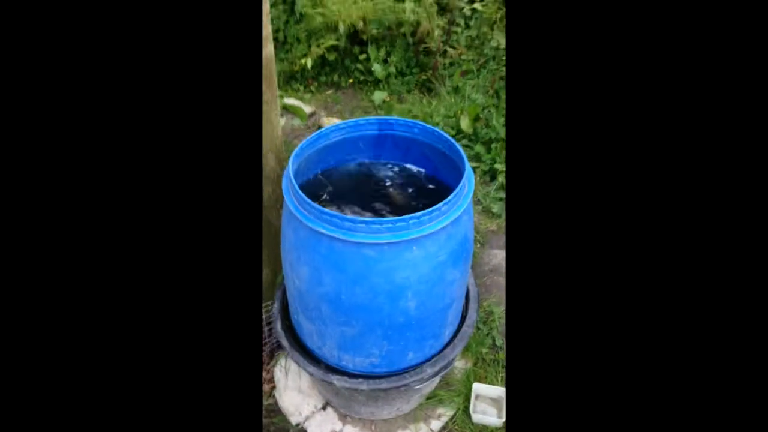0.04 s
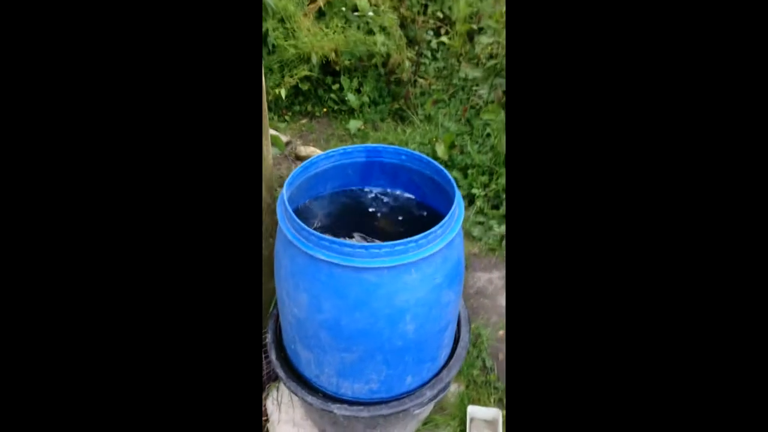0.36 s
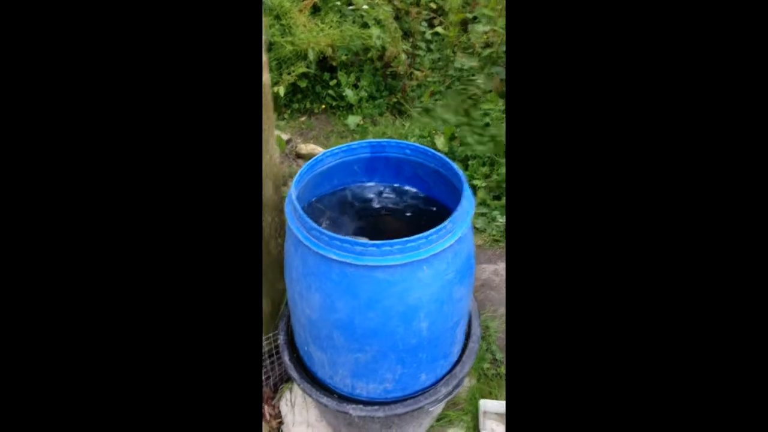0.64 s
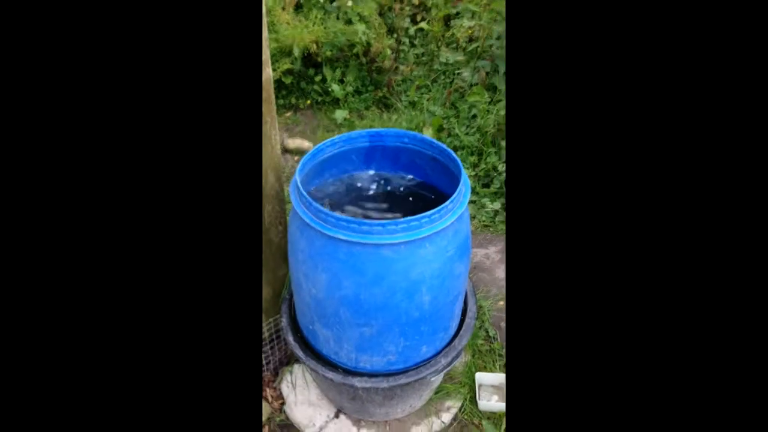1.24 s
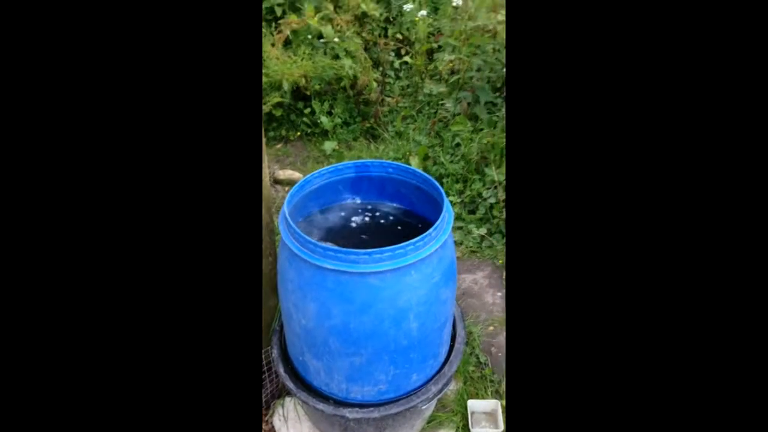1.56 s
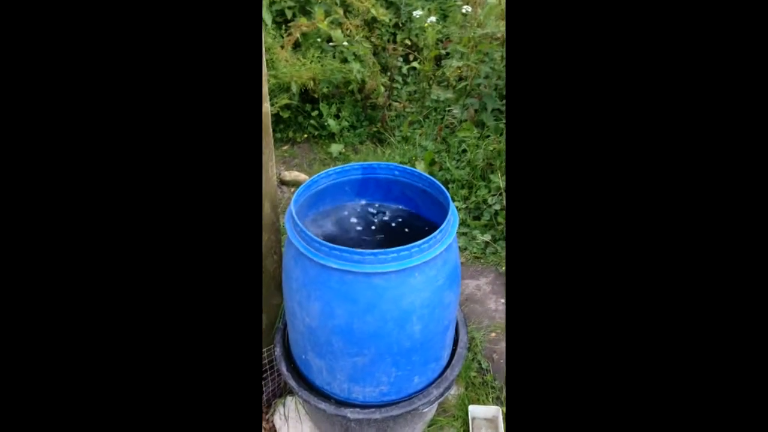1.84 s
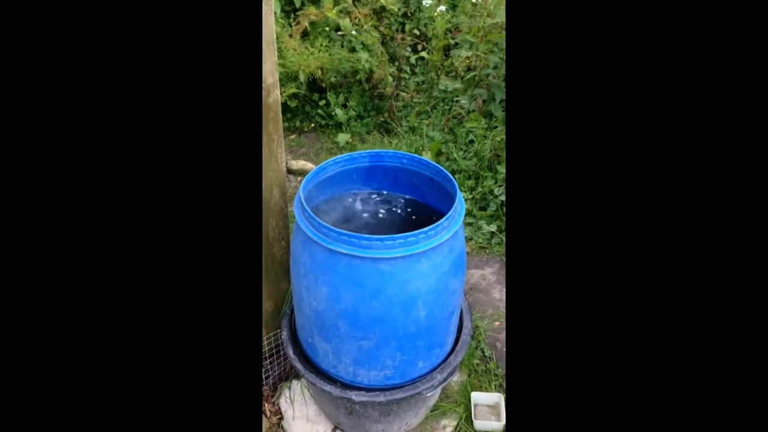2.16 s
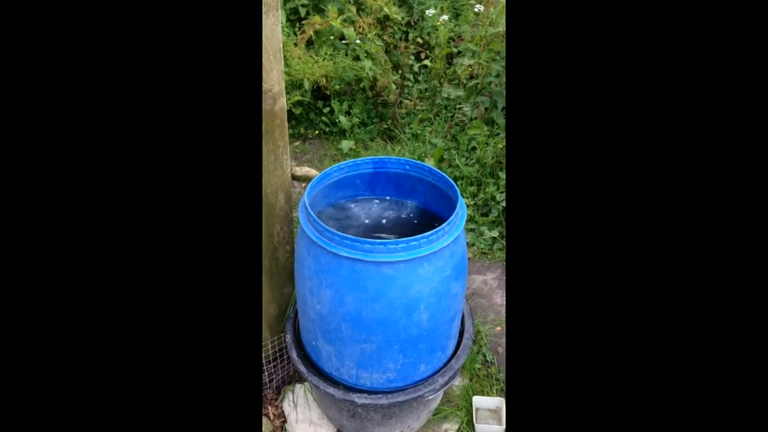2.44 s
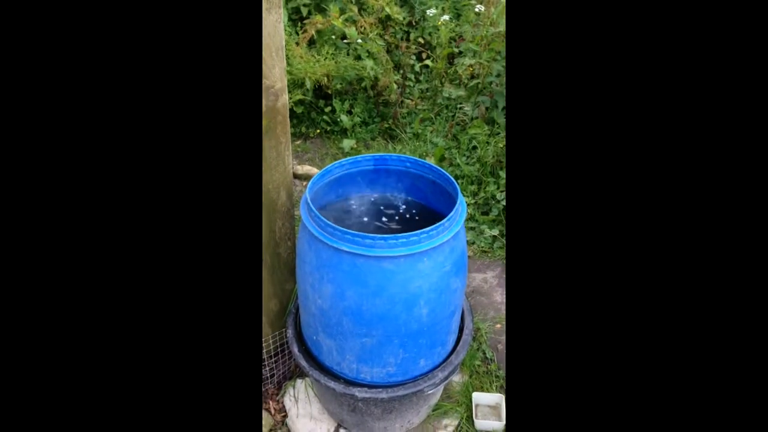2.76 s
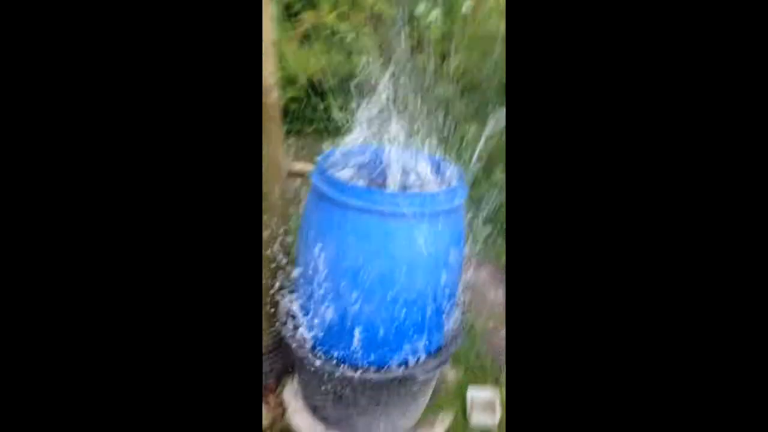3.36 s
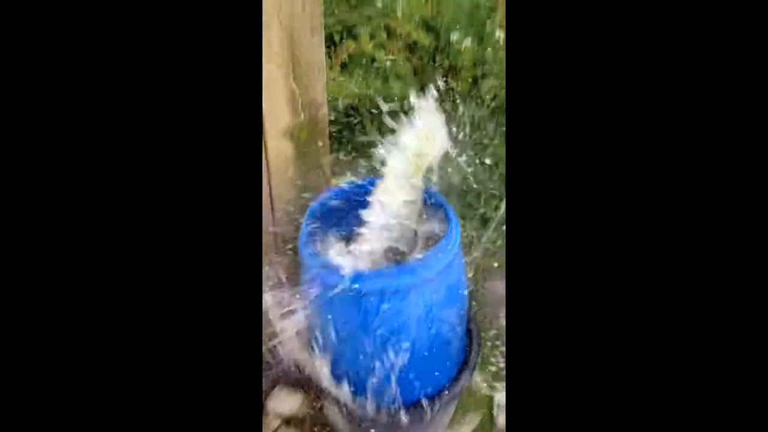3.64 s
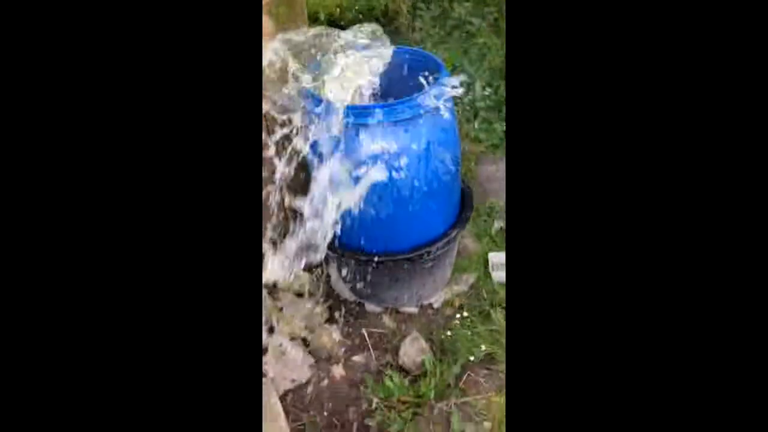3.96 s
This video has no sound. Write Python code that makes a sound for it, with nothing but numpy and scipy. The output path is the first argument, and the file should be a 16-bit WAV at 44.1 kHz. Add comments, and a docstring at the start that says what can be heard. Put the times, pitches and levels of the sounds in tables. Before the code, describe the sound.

A firecracker goes off underwater in a plastic barrel with one loud, hollow bang. Before it, birds chirp softly in a quiet garden while the fuse spits and bubbles. Afterwards spray and heavy slaps of water fall close by.

```python
"""Songbirds and a spitting fuse in a quiet garden: a firecracker sinks in a plastic rain barrel.
Its gas bubbles up; the barrel's hollow hums faintly. At about 3.3 s it goes off under water:
shocks ring the wall, the gas pocket throbs and the surface bursts with a crack.
The thrown water comes down as spray and heavy slaps while trapped air gulps in the barrel."""
import sys
import numpy as np
from scipy import signal
from scipy.fft import rfft, irfft
from scipy.io import wavfile
from scipy.ndimage import map_coordinates

SR = 44100
rng = np.random.default_rng(int(sys.argv[2]) if len(sys.argv) > 2 else 0)


def put_to_file(sound):
    """Save the sound as 16-bit audio at rate SR, in the file named by the first command-line argument."""
    columns = np.atleast_2d(sound).T  # one column per channel
    safe = np.clip(columns, -1, 1)
    whole_steps = np.round(safe * 32767)
    wavfile.write(sys.argv[1], SR, whole_steps.astype(np.int16))


N = 176400
T = np.arange(N) / SR


def from_db(db):
    """Decibels to gain."""
    return 10 ** (np.asarray(db) / 20)


def rms_one(x):
    """Scale to unit rms."""
    return x / np.sqrt(np.mean(x ** 2) + 1e-20)


def butter(x, hz, kind):
    """Second-order low- or high-pass."""
    return signal.sosfilt(signal.butter(2, min(hz, .45 * SR), kind, fs=SR, output="sos"), x + 1e-18)


def coloured(spectrum, x=None):
    """White noise, or texture x, shaped by (Hz, dB) points; rms 1."""
    hz, db = np.transpose(spectrum)
    f = np.maximum(np.fft.rfftfreq(N, 1 / SR), 1)
    gain = from_db(np.interp(np.log(f), np.log(hz), db)) / np.sqrt(1 + (hz[0] / 2 / f) ** 4)
    return rms_one(irfft(rfft(rng.standard_normal(N) if x is None else x) * gain, N))


def drift(per_s):
    """Smooth random curve, spread about 1."""
    knots = rng.standard_normal(N // 20)
    return map_coordinates(knots, [T * per_s], order=3, mode="wrap")


def ring(x, hz, t60_s):
    """Resonator: a unit click starts a decaying sine of height 1."""
    r, w = np.exp(-np.log(1000) / (t60_s * SR)), 2 * np.pi * hz / SR
    return signal.lfilter([0, np.sin(w)], [1, -2 * r * np.cos(w), r * r], x + 1e-18)


def envelope(rows, attack_s):
    """Amplitude of events that rise, hold and die, summed in power."""
    power = np.zeros(N)
    for start_s, db, hold_s, t60_s in rows:
        rise = from_db(db) * np.clip((T - start_s) / attack_s, 0, 1)
        power += rise ** 2 * np.exp(-np.clip(2 * np.log(1000) * (T - start_s - hold_s) / t60_s, 0, 60))
    return np.sqrt(power)


def grains(per_s, low_hz, high_hz, cycles, spread_db):
    """Random drops, each ringing briefly at one of 20 pitches; rms 1."""
    sizes = from_db(spread_db * np.minimum(rng.exponential(1, N), 5)) * rng.choice([-1, 1], N)
    clicks = sizes * (rng.random(N) < per_s / SR)
    pitch_index = rng.integers(0, 20, N)
    return rms_one(sum(ring(clicks * (pitch_index == k), hz, cycles / hz) * hz
                       for k, hz in enumerate(np.geomspace(low_hz, high_hz, 20))))


def whistle(start_s, length_s, pitch_hz, swell_share=0.32):
    """Soft-edged tone at pitch_hz(u, t): progress u from 0 to 1, scene time t in seconds."""
    tone = np.zeros(N)
    on = (T >= start_s) & (T < start_s + length_s)
    u = (T[on] - start_s) / length_s
    level = np.sqrt(2 * np.sin(np.pi * u) * np.minimum(u / swell_share, 1))
    tone[on] = level * np.sin(2 * np.pi * np.cumsum(pitch_hz(u, T[on])) / SR)
    return tone


def garden_echo(x, t60_s=0.62):
    """Diffuse echo from walls and hedges."""
    tail = rng.standard_normal(N) * np.exp(-np.log(1000) * T / t60_s) * (T > .012)
    return signal.fftconvolve(x, tail / np.sqrt(np.sum(tail ** 2)))[:N]


def background():
    """Still garden air and two wavering resonances of the barrel's hollow."""
    # Garden air. Each row: frequency in Hz, level in dB.
    air_colour = [(30, -10.5), (55, 0), (100, -2.5), (170, -3.5), (250, -16), (440, -17.5), (600, -21),
                  (900, -23.5), (1500, -27.5), (2300, -23.5), (3000, -25.5), (6000, -29.5), (13500, -32.5),
                  (15000, -41)]
    # Cavity modes. Each row: frequency in Hz, bandwidth in Hz, level in dB.
    modes = [(159, 24.5, -56.5), (567.3, 28.5, -59)]
    # Hum swells. Each row: time in seconds, lower mode's offset in dB, upper mode's offset in dB.
    swells = [(0, -2.5, 3), (1.0, -2.5, 0), (1.25, 3, -1.5), (1.9, -1, -1.5), (2.25, 4.5, -8),
              (2.8, 4.5, -15), (3.202, 3, -4), (4, -7, 9.5)]
    times_s, *offsets_db = np.transpose(swells)
    hum = np.zeros(N)
    for (hz, width_hz, db), offset_db in zip(modes, offsets_db):
        level = from_db(db + np.interp(T, times_s, offset_db) + drift(13))
        mode = ring(rng.standard_normal(N), hz, t60_s=np.log(1000) / (np.pi * width_hz))
        hum += level * rms_one(butter(mode, 0.74 * hz, "high"))
    return from_db(-55.5) * coloured(air_colour) + hum


def birds(trill_hz=84.4, chip_from_hz=4000, chip_to_hz=3050):
    """One bird glides and trills, a second adds a swelling run of falling chips; both echo."""
    # Song. Each row: start and length in seconds, first, middle and last pitch in Hz,
    # level in dB, trill depth in Hz.
    notes = [(-.03, 0.083, 2850, 2530, 2210, -52.5, 170), (0.151, 0.041, 4550, 4900, 5300, -46.5, 82),
             (0.212, 0.053, 4900, 4550, 4500, -48.5, 400), (0.36, 0.062, 3940, 3680, 3680, -43.5, 22),
             (.405, 0.049, 3660, 3830, 3920, -43.5, 20), (0.557, 0.038, 4620, 4400, 4360, -47, 100),
             (0.593, 0.033, 3860, 3300, 3020, -40, 90), (0.694, 0.032, 3210, 3300, 3170, -48, 30),
             (0.717, 0.078, 3650, 3406, 3066, -43, 46), (1.222, 0.16, 2110, 2350, 2230, -64.5, 50),
             (1.317, 0.13, 2280, 2170, 2160, -59.5, 89), (1.597, .18, 2297, 2060, 1855, -61.5, 160),
             (1.804, 0.097, 2445, 2338, 2250, -56, 19), (1.889, .07, 2005, 1950, 1970, -59.5, 50),
             (2.07, .10, 2340, 2325, 2285, -65.5, 30), (2.196, 0.062, 2290, 2600, 2960, -56.5, 120),
             (2.251, 0.095, 2980, 3000, 2950, -59, 97), (2.259, 0.34, 1755, 1644, 1560, -71, 13),
             (2.513, 0.11, 1764, 2228, 2810, -52.5, 59), (2.96, 0.057, 4360, 3850, 3180, -61.5, 450),
             (3.009, 0.025, 3200, 3190, 3200, -54.5, 17), (3.026, .035, 2640, 2620, 2620, -65, 23),
             (3.122, 0.056, 4430, 3770, 3240, -62, 390), (3.164, 0.037, 3260, 3110, 3100, -56.5, 20)]
    song, chips = np.zeros(N), np.zeros(N)
    for start_s, length_s, first_hz, middle_hz, last_hz, db, depth_hz in notes:
        glide = np.polyfit([0, .5, 1], [first_hz, middle_hz, last_hz], 2)
        def note_hz(u, t):
            return np.polyval(glide, u) + depth_hz * np.sin(2 * np.pi * trill_hz * t)
        song += from_db(db) * whistle(start_s, length_s, note_hz)
    blur_hz = 352 * drift(900)
    def chip_hz(u, t):
        return chip_from_hz + (chip_to_hz - chip_from_hz) * u + np.interp(t, T, blur_hz)
    for k in range(10):
        chips += from_db(-64 + 0.5 * k) * whistle(2.38 + .0535 * k, 0.026, chip_hz)
    song *= from_db(3.5 * drift(130))
    return song + chips + garden_echo(from_db(-8) * song + from_db(-3.5) * chips)


def fuse(rise_s=0.059, fall_s=0.031):
    """The burning fuse spits puffs of fluttering hiss."""
    # Puffs. Each row: start in seconds, length in seconds, level in dB.
    spits = [(0.0, 0.12, -50.5), (0.108, 0.19, -50), (0.499, 0.11, -47.5), (0.585, .088, -47.5),
             (0.805, 0.11, -52.5), (0.89, 0.11, -62), (1.0, 0.11, -59.5), (1.304, 0.082, -51.5)]
    # Hiss. Each row: frequency in Hz, level in dB.
    hiss_colour = [(500, -6.5), (1200, -2), (2500, 0), (4500, 5), (7000, -2.5), (10000, -4), (15000, -15)]
    puffs = np.zeros(N)
    for start_s, length_s, db in spits:
        rise = np.clip((T - start_s) / rise_s, 0, 1) ** 0.62
        fall = np.clip((start_s + length_s - T) / fall_s + .5, 0, 1)
        puffs += from_db(db) * rise * fall
    return puffs * from_db(1.1 * drift(120)) * coloured(hiss_colour)


def bubbles(length_s=.085, from_hz=600, to_hz=2127):
    """Gas bubbles open at the surface: an upward sweep and a puff of froth each."""
    # Bubbles. Each row: start in seconds, tone level in dB, froth level in dB.
    blips = [(.12, -61.5, -67), (.365, -70, -65), (.595, -59, -52), (.715, -62, -68), (.82, -70, -48.5),
             (1.31, -69, -67), (1.51, -60.5, -67), (3.075, -69, -79)]
    def sweep_hz(u, t):
        return from_hz * (to_hz / from_hz) ** (u ** 1.6)
    tones = sum(from_db(db) * whistle(start_s, length_s, sweep_hz) for start_s, db, _ in blips)
    froth = envelope([(start_s + 0.012, db, .04, .1) for start_s, _, db in blips], attack_s=0.028)
    froth_colour = [(600, -7), (1000, -3), (1600, 6), (2400, -6), (5000, -11.5)]
    return tones * from_db(2 * drift(220)) + froth * coloured(froth_colour)


def barrel_boom():
    """Shocks strike the plastic wall and ring its modes."""
    # Shocks. Each row: time in seconds, gain in dB, contact low-pass in Hz.
    shocks = [(3.2595, -25, 1450), (3.2711, -5, 700), (3.2770, -0.5, 610), (3.2834, 2, 3000),
              (3.2941, 4, 4000)]
    # Wall modes, one entry each: frequency in Hz, gain in dB, T60 in seconds.
    modes_hz = [87, 140, 188, 221, 264, 316, 389, 472, 507, 540, 612, 733, 806, 874, 1055, 1106, 1240, 1462,
                1571, 3472]
    modes_db = [-18, -22, -16, -20, -22, -20, -24, -23, -32, -27, -21, -24, -30, -22.5, -22.5, -26.5, -25,
                -27, -27, -20]
    modes_t60_s = [.09, 0.05, 0.16, 0.12, 0.19, .15, 0.14, 0.086, 0.16, 0.21, .14, .11, .1, 0.12, 0.076,
                   0.16, 0.08, .08, .08, .04]
    force = sum(butter(from_db(db) * (np.arange(N) == int(time_s * SR)), contact_hz, "low")
                for time_s, db, contact_hz in shocks)
    return sum((-1) ** k * from_db(db) * ring(force, hz, t60_s)
               for k, (hz, db, t60_s) in enumerate(zip(modes_hz, modes_db, modes_t60_s)))


def surface_burst():
    """The surface tears open in cracks of rough noise; a brief squeak precedes the loudest."""
    # Cracks. Each row: start in seconds, level in dB, hold and T60 in seconds.
    cracks = [(3.2595, -38.5, 0.016, 0.076), (3.2826, -12.5, .004, 0.054), (3.2928, -8, .0045, 0.024),
              (3.300, -25.5, 0.0089, .19)]
    # Tearing water. Each row: frequency in Hz, level in dB.
    tear_colour = [(300, 3), (480, 10.5), (900, 9), (1500, 2.5), (2100, -2.5), (3100, 0), (3500, 2.5),
                   (4000, -3.5), (5500, -7), (9000, -11.5), (15000, -15)]
    tear = coloured(tear_colour, rng.standard_normal(N) * from_db(1.2 * drift(1500)))
    squeak = whistle(start_s=3.272, length_s=0.0095, pitch_hz=lambda u, t: np.full_like(u, 3000))
    return envelope(cracks, attack_s=0.00043) * tear + from_db(-28) * squeak


def gas_throb(start_s=3.2741, hold_s=0.015, edge_s=0.0022, start_hz=240.4, rise_hz_per_s=3730):
    """The gas pocket swells, throbs with rising pitch and dies."""
    t = T - start_s
    level = np.exp(np.clip(np.minimum(t, hold_s - t) / edge_s, -60, 0))
    turns = np.cumsum(start_hz + rise_hz_per_s * np.clip(t, 0, hold_s)) / SR
    return from_db(-3) * level * np.sin(2 * np.pi * (turns - np.interp(start_s, T, turns)))


def heave(centre_s=3.2802, width_s=0.003):
    """The water surface lifts: one push and pull of air."""
    u = (T - centre_s) / width_s
    return -from_db(-13.5) * u * np.exp(-np.minimum(u * u, 100) / 2)


def churn():
    """Churning water: a short, low rush."""
    # Surge. One row: start in seconds, level in dB, hold and T60 in seconds.
    surge = [(3.285, -21.5, 0.041, 0.25)]
    # Rush. Each row: frequency in Hz, level in dB.
    rush_colour = [(50, -24), (140, -6.5), (240, 1), (450, -9.5), (700, -20), (1500, -24), (4000, -58)]
    return envelope(surge, attack_s=0.015) * coloured(rush_colour)


def spray(drops_per_s=9800, fade_in_s=0.029):
    """Thrown water falls as patter, mist, ringing droplets and short splats."""
    # Fall of spray. Each row: time in seconds, level in dB.
    shower = [(3.42, -58.5), (3.43, -56), (3.446, -65.5), (3.514, -40), (3.546, -36.5), (3.592, -43),
              (3.628, -28.5), (3.748, -44.5), (3.796, -33.5), (3.944, -42), (4.0, -43.5)]
    # Patter and mist. Each row: frequency in Hz, level in dB.
    spray_colour = [(880, -7), (1500, -1.5), (2100, -2.5), (2620, -3), (2970, -2), (4330, -3), (7210, -11),
                    (12500, -16.5), (15000, -23.5)]
    times_s, levels_db = np.transpose(shower)
    level = from_db(np.interp(T, times_s, levels_db)) * np.clip((T - times_s[0]) / fade_in_s + 1, 0, 1)
    impacts = rng.standard_normal(N) * (rng.random(N) < drops_per_s / SR)
    impacts *= from_db(4 * np.minimum(rng.exponential(1, N), 4))
    patter = from_db(-3) * coloured(spray_colour, impacts)
    mist = from_db(-1) * coloured(spray_colour)
    hiss = butter(patter + mist, 700, "high")
    droplets = from_db(-19) * grains(per_s=3900, low_hz=1000, high_hz=4870, cycles=18, spread_db=1)
    splats = from_db(-9) * grains(per_s=260, low_hz=1500, high_hz=8000, cycles=4, spread_db=2)
    return level * from_db(1.5 * drift(150)) * (hiss + droplets + splats)


def gulps(attack_s=0.0039, rise_per_s=2.72):
    """Big pockets of trapped air ring with rising pitch."""
    # Air pockets. Each row: start in seconds, starting pitch in Hz, gain in dB, T60 in seconds.
    pockets = [(3.46, 129, -30, 0.12), (3.484, 211, -31, 0.12), (3.529, 1030, -17, 0.023),
               (3.603, 517, -24, 0.034), (3.625, 189, -23.5, .12), (3.639, 894, -22.5, 0.12),
               (3.646, 444, -24.5, 0.096), (3.748, 532, -25, 0.053), (3.769, 500, -30.5, 0.049),
               (3.783, 203, -24.5, 0.13), (3.839, 232, -25, 0.11), (3.904, 767, -34, 0.093),
               (3.913, 195, -24.5, .23)]
    sound = np.zeros(N)
    for start_s, hz, db, t60_s in pockets:
        t = np.clip(T - start_s, 0, 2 * t60_s)
        level = from_db(db) * (1 - np.exp(-t / attack_s)) * np.exp(-np.log(1000) * t / t60_s)
        sound += level * np.sin(2 * np.pi * hz * t * (1 + rise_per_s * t / 2))
    return sound


def slaps():
    """Sheets of water hit the ground as dense bursts of drops."""
    # Landings. Each row: start in seconds, level in dB, hold and T60 in seconds.
    sheets = [(3.466, -43, 0.022, .2), (3.53, -42, 0.016, 0.41), (3.602, -30.5, 0.026, .15),
              (3.643, -31, 0.01, 0.17), (3.747, -36, 0.0072, 0.19), (3.787, -38, 0.05, .18),
              (3.842, -33.5, 0.013, 0.34), (3.903, -35.5, 0.013, 0.16)]
    # Slap spectrum. Each row: frequency in Hz, level in dB.
    slap_colour = [(60, -43), (150, -2), (450, -2.5), (700, -4), (920, -4), (1300, -14), (2200, -10.5),
                   (5000, -40)]
    drops = grains(per_s=5000, low_hz=107, high_hz=5040, cycles=5.1, spread_db=2)
    return envelope(sheets, attack_s=0.0044) * coloured(slap_colour, drops)


def scene():
    """Mono, beside the barrel: garden and fuse, the bang with its dull echo, the splash."""
    lead_in = background() + birds() + fuse() + bubbles()
    bang = barrel_boom() + surface_burst() + gas_throb() + heave() + churn()
    echo = from_db(-27.5) * garden_echo(butter(bang, 500, "low"))
    splash = spray() + gulps() + slaps()
    return (lead_in + bang + echo + splash)[None]


def record(dry, ceiling=1.05, cutoff_hz=15400):
    """Soft overload rounds the bang; a steep low-pass cuts the top."""
    rounded = dry / (1 + (dry / ceiling) ** 4) ** .25
    return signal.sosfilt(signal.ellip(10, .2, 80, cutoff_hz, fs=SR, output="sos"), rounded)


dry = scene()
out = record(dry)
put_to_file(out)
```